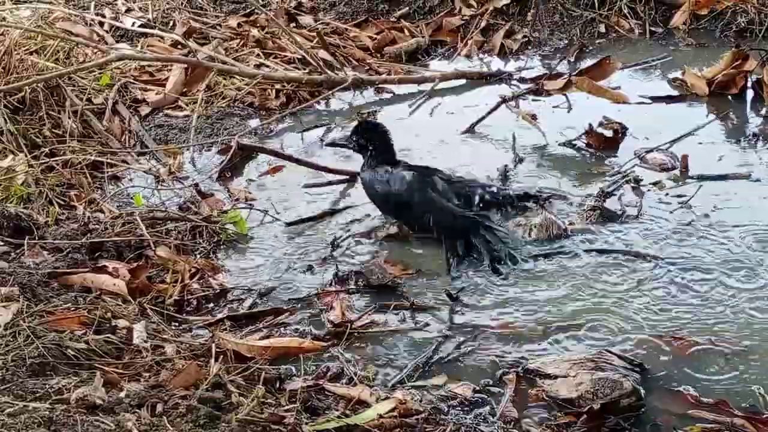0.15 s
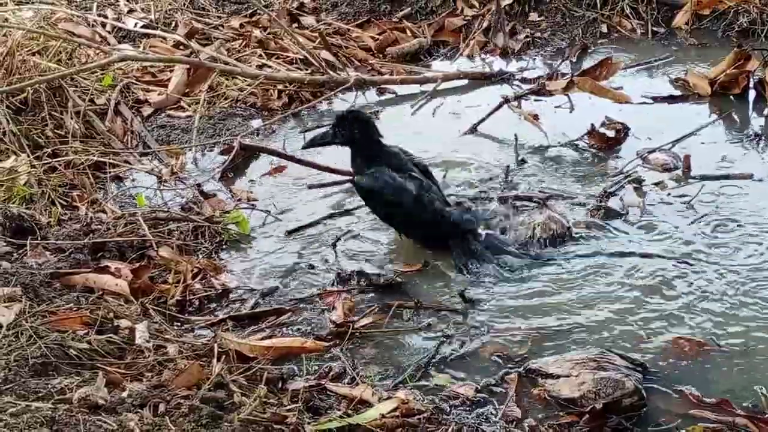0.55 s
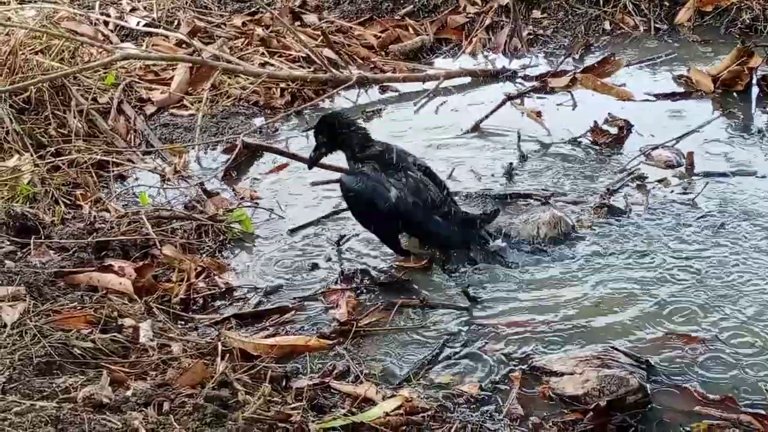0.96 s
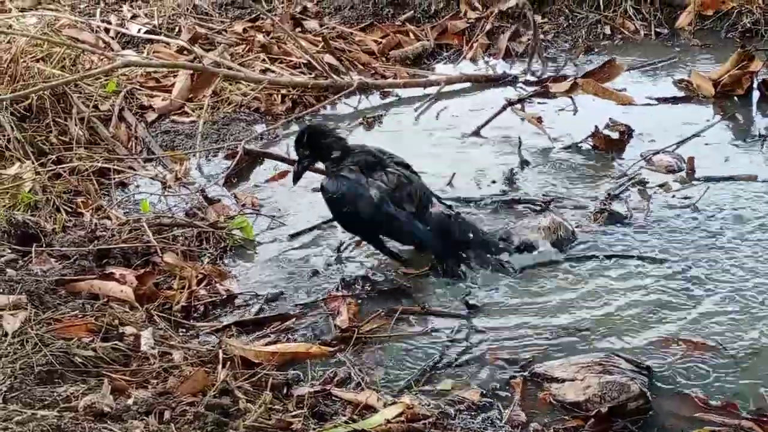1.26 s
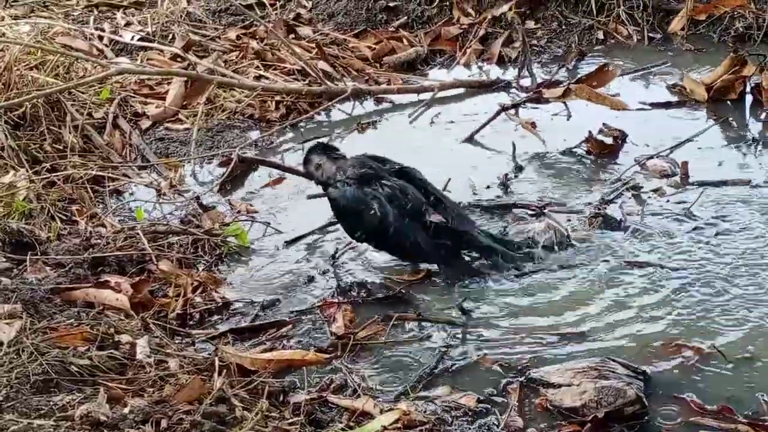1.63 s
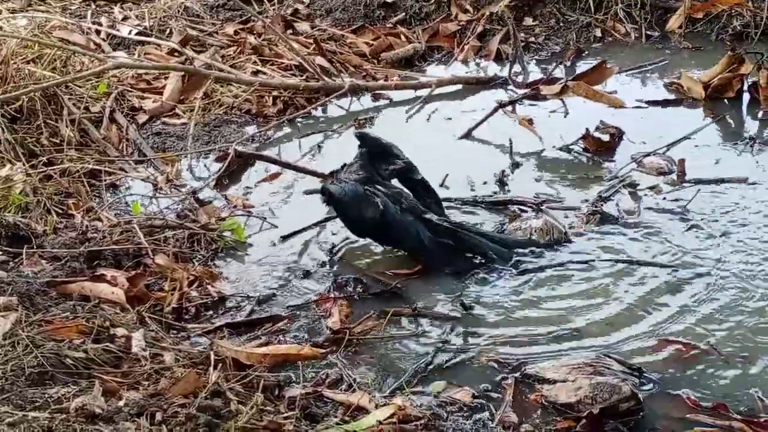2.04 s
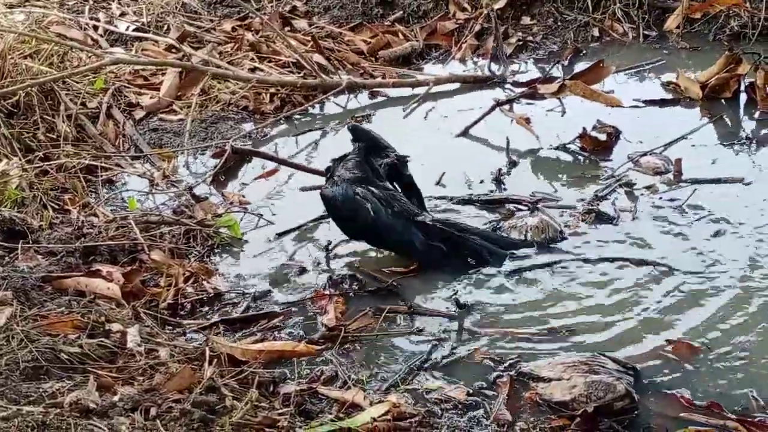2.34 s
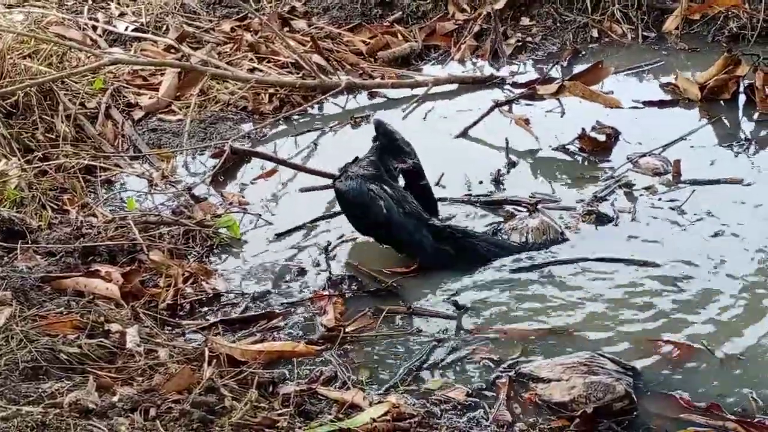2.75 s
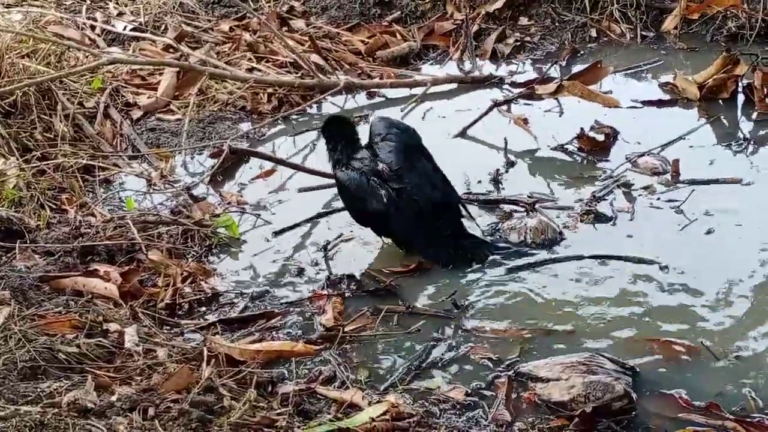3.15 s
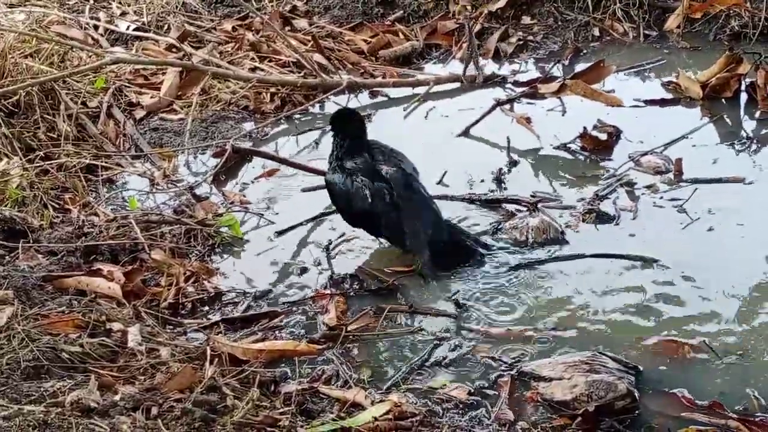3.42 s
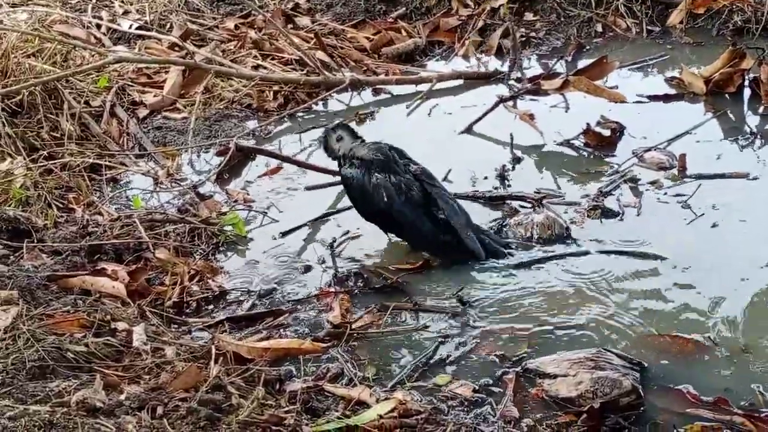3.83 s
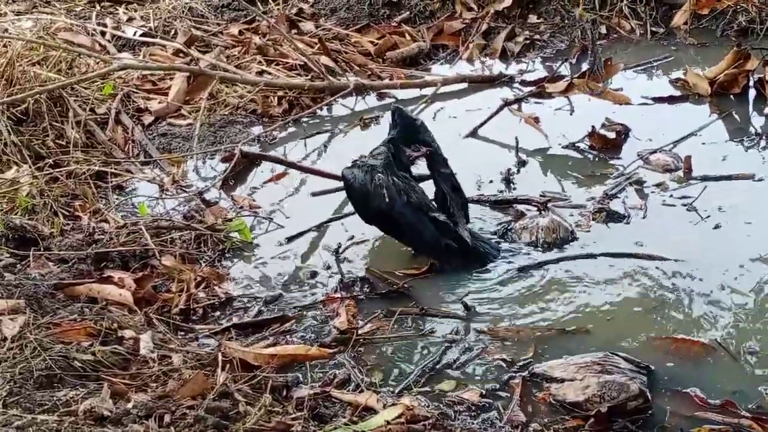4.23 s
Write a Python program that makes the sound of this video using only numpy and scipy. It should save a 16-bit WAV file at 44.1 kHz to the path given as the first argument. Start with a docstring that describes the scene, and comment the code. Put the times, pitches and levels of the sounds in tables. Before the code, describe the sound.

Rapid bright wing splashes with plinking drops give way to near quiet, one soft hollow knock, sparse wet ticks and a distant engine drone.

```python
"""Crow bathing in a shallow puddle

Straight ahead, wet wings slap the water about seven times a second: crackle, mist, drops and ringing bubbles.
Then it preens, with a few small ticks; one dull, hollow thud of bumps and decaying modes sounds midway.
Off to the right lie a faint far engine, drone tones over a deep rumble, and an outdoor hiss of patchy noise."""
import sys
import numpy as np
from scipy import signal
from scipy.fft import rfft, irfft, next_fast_len
from scipy.io import wavfile
from scipy.ndimage import uniform_filter1d, map_coordinates

SR = 44100
rng = np.random.default_rng(int(sys.argv[2]) if len(sys.argv) > 2 else 0)


def store_wav(level_fs):
    """Save 16-bit WAV to argv[1]."""
    pcm = np.round(np.clip(np.atleast_2d(level_fs), -1, 1) * 32767)
    wavfile.write(sys.argv[1], SR, pcm.T.astype(np.int16))


N = 193202

# Wing strokes in the water, hard or gentle. Each row: moment in seconds, relative level in dB, rise in s,
# fall in s, then relative to the stroke: low slap in dB, air pocket pitch in Hz, its ring in dB, mist in dB.
WING_STROKES = [(.007, -32.5, .0088, 0.018, -19, 930, -15.5, -8),
                (.165, -34, 0.00089, 0.0054, -12, 2300, 0, -16),
                (.378, -50.5, .008, 0.077, 8, 1270, 4, -20), (.457, -33, 0.004, 0.0078, -8, 940, -13, -11),
                (.58, -33.5, 0.0069, 0.01, -13, 3400, -5.5, -6),
                (.699, -33.5, .0027, 0.0053, -6, 1700, -10, -9),
                (.713, -35, .0024, .0071, -3, 1720, -9, -11), (.841, -36, .008, 0.014, -5, 5660, -3, -4),
                (.857, -33.5, .0077, 0.014, -13, 2450, -2.5, -12),
                (.991, -27, 0.0036, 0.0078, 1, 1190, -4.5, -8),
                (1.132, -29.5, 0.0074, 0.012, -0.5, 4450, -2, -7),
                (1.28, -32.5, .0044, .018, 0.5, 2500, -5, -6),
                (1.46, -30.5, .0069, 0.012, -0.5, 7440, -2.5, -18),
                (1.573, -40, .0008, 0.014, -12, 2100, 3, -20),
                (1.684, -37, .001, 0.013, -9, 4700, -12, -20),
                (1.816, -43.5, .0008, .014, -3, 2550, -1, -20),
                (2.745, -45, .0089, .012, 3.5, 1600, -11, -30),
                (4.15, -61, 0.029, 0.06, 12.5, 2200, -5, -30)]
# Colour of splashing water. Each row: frequency in Hz, relative density in dB per Hz.
WATER_COLOUR = [(300, -53), (700, -16), (1200, -5), (1800, -5), (3000, -4.5), (4400, 1.5), (5100, -5),
                (5800, 0), (7400, 0), (8300, -8.5), (9300, -19), (11200, -28.5), (15500, -12)]
# Colour of a single drop's crack. Each row: frequency in Hz, relative density in dB per Hz.
DROPLET_COLOUR = [(500, -45), (1200, -15.5), (1800, -9.5), (3000, -4), (4400, 3), (5100, -2.5), (5800, -1),
                  (7400, 1), (8300, -7), (9300, -20.5), (11200, -25.5), (15500, -10.5)]


def wings():
    """Each stroke tears the surface into crackle and fizz over a slap, rings an air pocket, throws mist and beads."""
    # Colours of the low slap and the finest spray. Each row: frequency in Hz, relative density in dB per Hz.
    slap_colour = [(40, -30), (150, -2), (330, -1.5), (520, -15), (660, -20.5), (950, -1.5), (1350, 0),
                   (2200, -7), (4000, -32), (8000, -51)]
    mist_colour = [(7000, -45), (8500, -10), (9500, -4), (11200, -9), (12500, -3), (15500, 1)]
    pocket_q = 4.4  # sharpness of the air pocket under a wing
    mist_lingers = 1.2  # the mist's decay time over the stroke's
    beads_db, beads_rise_s, beads_fall_s = -16, .005, 0.031  # larger beads that click apart
    flutter_db, flutter_rate = 1.5, 330  # feathers break the surface unevenly: depth, changes per second

    crackle = coloured(patter(rate=3100, spread_db=4.5), WATER_COLOUR)
    froth = coloured(fizz(rate=1500, cycles=4.9, spread_db=1.5), WATER_COLOUR)
    gurgle = unit(blips(rate=260, low_hz=450, spread=4.9, cycles=4.0, spread_db=15))
    slap = coloured(patter(rate=2900, spread_db=5.5) + .3 * gurgle, slap_colour)
    beads = coloured(patter(rate=330, spread_db=2.5), DROPLET_COLOUR)
    knocks = patter(rate=2500, spread_db=8.0)
    mist = coloured(patter(rate=1800, spread_db=4), mist_colour)
    out = np.zeros(N)
    for s, db, rise, fall, slap_db, hz, pocket_db, mist_db in WING_STROKES:
        b, a = signal.iirpeak(hz, pocket_q, SR)
        # two passes make the pocket's skirts steeper
        pocket = unit(signal.lfilter(b, a, signal.lfilter(b, a, knocks)))
        splash = 0.86 * crackle + 0.62 * froth
        body = splash + amp(slap_db - 7.0) * slap + amp(pocket_db) * pocket
        out += amp(db - 3.5) * swell(s, rise, fall) * body
        out += amp(db + mist_db - 4.5) * swell(s, rise, mist_lingers * fall) * mist
        out += amp(db + beads_db) * swell(s, beads_rise_s, beads_fall_s) * beads
    return out * unit(amp(flutter_db * wobble(flutter_rate)))


def churn():
    """Small bubbles keep popping up in the stirred water, calming after each stroke."""
    # Colour of the churned water. Each row: frequency in Hz, relative density in dB per Hz.
    churn_colour = [(500, -38), (780, -16), (950, -5.5), (1250, 5), (1700, -6.5), (2300, 1), (3300, -5),
                    (5000, -25)]
    level_db, rise_s, fall_s = -19.5, 0.024, 0.081  # relative to the stroke, build-up, time to calm
    pops = blips(rate=170, low_hz=853, spread=4.5, cycles=11.8, spread_db=16.0)
    stirred = stroke_power(level_db, rise_s, fall_s)
    return np.sqrt(stirred) * coloured(pops, churn_colour)


def spray():
    """Fine droplets fly with every stroke and fall in showers: tiny impacts mixed with short rings."""
    # Showers shaken from the plumage. Each row: middle in seconds, level in dB, half length in s.
    showers = [(0.207, -39, 0.06), (0.397, -48.5, 0.03), (0.65, -49.5, 0.056), (0.813, -40.5, 0.031),
               (1.069, -41, 0.031), (1.156, -46, .01), (1.233, -45.5, 0.025), (1.658, -44.5, 0.034),
               (3.37, -50, .02), (3.537, -47.5, 0.052)]
    level_db, rise_s, fall_s = -12, 0.032, 0.037  # relative to the stroke, build-up, time to settle
    trickle_db = -60  # water running off the feathers all the time
    thrown = stroke_power(level_db, rise_s, fall_s)
    shaken = sum((amp(db) * np.exp(-((clock() - s) / half) ** 2)) ** 2 for s, db, half in showers)
    droplets = patter(rate=5000, spread_db=3.2) + .7 * fizz(rate=2000, cycles=7, spread_db=2.8)
    level = np.sqrt(thrown + shaken + amp(trickle_db) ** 2)
    return level * amp(0.94 * wobble(70)) * coloured(droplets, WATER_COLOUR)


def drops():
    """A drop lands with a crack and a tick of a few cycles, then a thin splatter; droplets fall back after it."""
    # Drops and feather flicks. Each row: moment in seconds, level in dB, centre of the tick in Hz,
    # splatter in dB and crack in dB relative to the drop.
    drop_rows = [(.0075, -17, 6540, -11.5, -10), (0.1295, -40, 7740, -17, -11),
                 (.1445, -35, 6500, -12, -11), (.1485, -29.5, 6700, -9, -11),
                 (0.1638, -18.5, 4650, -9, -10), (0.1695, -30, 6160, -19, -11),
                 (.2035, -26, 7200, -12, -11), (0.406, -30, 5630, -12, -11),
                 (0.4234, -27.5, 6170, -10, -13), (.431, -29, 4100, -18, -11),
                 (.4545, -23.5, 7700, -9, -13), (.4568, -26, 4440, -16, -13),
                 (0.459, -22.5, 6200, -16, -11), (.4822, -28, 3300, -8, -11), (0.572, -28, 3980, -20, -14),
                 (0.5772, -20, 3840, -29, -8), (0.5823, -27, 4130, -16, -11), (0.6137, -29, 2740, -11, -9),
                 (.625, -27, 7600, -23, -9), (.6478, -28, 7700, -10, -11), (0.6883, -22.5, 5900, -13, -12),
                 (0.6984, -31, 4300, -16, -13), (0.7114, -28, 6000, -14, -11),
                 (0.7588, -26.5, 4400, -13, -11), (.8013, -27, 2360, -6.5, -5), (.8262, -31, 6000, -12, -8),
                 (.837, -27, 6000, -12, -7), (.8419, -26, 5330, -16, -11), (.8547, -24.5, 4700, -21, -8),
                 (0.8586, -27, 3400, -20, -13), (0.934, -29, 3760, -13, -11), (.945, -32, 5960, -1, -6),
                 (.9557, -20.5, 6460, -8, -12), (.9713, -25, 6700, -9, -2), (.9812, -22, 6000, -6, -11),
                 (0.9903, -14.5, 5800, -10, -11), (1.0932, -24.5, 7350, -16, -16),
                 (1.098, -26, 6900, -14, -15), (1.122, -31, 6040, -2, -8), (1.1283, -18.5, 4100, -26, -19),
                 (1.132, -19, 4300, -16, -9), (1.1346, -21, 7200, -14, -11), (1.159, -27, 3800, -14, -9),
                 (1.2405, -29, 6000, -14, -9), (1.2492, -20.5, 7250, -16, -13),
                 (1.266, -30, 4200, -17, -11), (1.272, -25, 6000, -12, -15), (1.2803, -17, 7300, -15, -11),
                 (1.283, -29, 4400, -19, -11), (1.4181, -23.5, 7160, -6.5, -10),
                 (1.439, -35, 5500, -14, -8), (1.448, -28, 6400, -8, -13), (1.4581, -18.5, 6700, -10, -15),
                 (1.4714, -37, 6900, -16, -13), (1.5708, -26, 4080, -13, -13),
                 (1.680, -16.5, 4300, -14, -13), (1.682, -20, 5360, -24, -15), (1.72, -33, 3870, -12, -9),
                 (1.814, -28.5, 6800, -7, -14), (1.858, -33, 3000, -17, -15),
                 (1.9455, -32.5, 4970, -23, -17), (1.969, -32.5, 3920, -5, -11),
                 (3.012, -25, 3880, -15, -22), (3.019, -34, 6000, -11, -14), (3.312, -35.5, 2700, -5, -6),
                 (3.342, -24.5, 6150, -11, -8), (3.3431, -22, 4050, -20, -14),
                 (3.3493, -28, 6700, -18, -15), (4.2945, -28, 3900, -15, -14), (4.304, -40, 2700, -7, -14)]
    crack_fall_s = 0.00056  # decay of the bright crack of first contact
    after_db, after_fall_s = -24, 0.014  # droplets that fall back: level relative to the drop, decay

    out = np.zeros(N)
    splatter = coloured(patter(rate=9000, spread_db=2.0), DROPLET_COLOUR)
    crack = coloured(rng.standard_normal(N), DROPLET_COLOUR)
    droplets = coloured(fizz(rate=1300, cycles=4.9, spread_db=3.5), DROPLET_COLOUR)
    for s, db, hz, splatter_db, crack_db in drop_rows:
        tick = np.sin(2 * np.pi * hz * (clock() - s)) * swell(s + .0004, .00015, .0006)
        contact = 0.83 * tick + amp(crack_db) * crack * swell(s + 0.00036, 0.0001, crack_fall_s)
        scattered = amp(splatter_db) * splatter * swell(s + 0.00107, 0.00012, 0.0034)
        falling_back = amp(after_db) * droplets * swell(s + 0.0051, 0.00045, after_fall_s)
        out += amp(db) * (contact + scattered + falling_back)
    return out


def bubbles(cycles, glide):
    """Trapped air rings briefly, rising in pitch as it nears the surface."""
    # Ringing air bubbles. Each row: start in seconds, pitch at the start in Hz, level in dB.
    bubble_rows = [(0.068, 1180, -36.5), (0.142, 1190, -34), (0.163, 1164, -28), (.165, 970, -34),
                   (0.177, 1350, -32), (.233, 4300, -30), (.244, 3950, -30), (.371, 1165, -34),
                   (0.575, 1016, -35.5), (.6145, 2950, -29), (.759, 3900, -29), (.800, 2930, -27),
                   (.801, 2180, -22), (.840, 1070, -35), (0.859, 2700, -28), (0.985, 1112, -25.5),
                   (0.986, 1340, -33), (0.991, 1530, -22), (1.064, 2350, -33), (1.13, 2060, -26),
                   (1.131, 530, -39), (1.135, 1580, -31), (1.271, 1210, -34), (1.28, 1470, -30),
                   (1.280, 935, -33), (1.46, 1510, -30), (1.570, 2280, -31), (1.688, 1950, -28),
                   (3.012, 2920, -30), (3.342, 3900, -32), (4.295, 3860, -32)]
    out = np.zeros(N)
    for s, hz, db in bubble_rows:
        turns = np.clip(clock() - s, 0, .1) * hz
        ring = np.sin(2 * np.pi * turns * (1 + glide * turns / cycles))
        out += amp(db) * ring * np.exp(-turns / cycles) * (1 - np.exp(-turns))
    return out


def thud():
    """A soft, uneven blow lands in quick bumps, a scuff and a low push each; something hollow rings, wet scatter."""
    # Modes of the hollow ring. Each row: pitch in Hz, relative level in dB, time to fall 60 dB in s, start in s.
    hollow_modes = [(157, -10.5, 0.16, 2.047), (211.5, -8.5, .16, 2.047), (289.5, -15, 0.23, 2.052),
                    (340.4, 1, .16, 2.031), (538.5, -4.5, 0.11, 2.049), (673, -15, 0.18, 2.045),
                    (820, -12, 0.15, 2.038), (875, -10, 0.14, 2.038), (994, -11, 0.088, 2.044),
                    (1102, -10, 0.34, 2.04), (1160, -12, 0.083, 2.044), (1195, -2, 0.097, 2.044),
                    (1614, -21, .26, 2.044), (2270, -6, .16, 2.045), (2410, -13.5, 0.26, 2.045),
                    (3900, -10, 0.25, 2.04), (4480, -13, .14, 2.04)]
    # Bumps of the blow. Each row: moment in seconds, level in dB, rise in s, fall in s,
    # low push in dB relative to the bump.
    bump_rows = [(2.035, -39, .0015, 0.0037, -10), (2.0407, -30, 0.0035, 0.0052, -15),
                 (2.0483, -23.5, .0014, 0.0025, -13.5), (2.058, -28, 0.0027, 0.013, -4.5),
                 (2.073, -43, .002, .008, -6), (2.088, -41.5, .003, 0.0054, -10),
                 (2.097, -45, .002, 0.0092, 4), (2.135, -52, .006, .035, -2)]
    # Colours of scuff, low push and wet scatter. Each row: frequency in Hz, relative density in dB per Hz.
    scuff_colour = [(200, -25), (420, -9), (540, -8), (620, -9), (820, -1), (1100, 4), (1550, -5.5),
                    (2200, 1), (3000, -6), (4400, -6), (7400, -12), (9300, -34), (15500, -48)]
    push_colour = [(40, -22), (80, -6), (140, 1.5), (330, -4), (420, -6), (540, -2), (700, -14),
                   (1500, -41)]
    scatter_colour = [(300, -14), (700, -7), (1200, 3), (2400, -2), (4000, 0), (7400, 0), (8500, -7),
                      (9500, -27), (15500, -27)]

    ring = np.zeros(N)
    for hz, db, t60, s in hollow_modes:
        t = np.maximum(clock() - s, 0)
        envelope = amp(db - 60 * t / t60) * (1 - np.exp(-t / .005))
        ring += envelope * np.sin(2 * np.pi * (hz * t + rng.random()) + .6 * wobble(110))
    lumps = amp(1.5 * wobble(200))  # unevenness of the scuff
    scuff = lumps * coloured(patter(rate=5000, spread_db=1.5), scuff_colour)
    push = coloured(rng.standard_normal(N), push_colour)
    bumps = sum(amp(db) * swell(s, rise, fall) * (scuff + amp(push_db) * push)
                for s, db, rise, fall, push_db in bump_rows)
    wet = coloured(patter(rate=700, spread_db=3), scatter_colour)
    scatter = amp(-38.5) * swell(2.058, rise=.008, fall=.052) * wet
    return bumps + scatter + amp(-25) * ring


def bank(x):
    """A short, scattered echo off the ground and leaves: decaying noise as the impulse response."""
    # Colour of the bank's echo. Each row: frequency in Hz, gain in dB on top of the echo's level.
    bank_colour = [(200, 12), (600, 10), (2000, 3), (4500, -23), (8000, 7), (13000, 13)]
    echo_db, fall_s = -33, 0.0033
    t = np.arange(SR // 30) / SR
    tail = rng.standard_normal(len(t)) * np.exp(-t / fall_s)
    echo = signal.fftconvolve(x, tail / np.linalg.norm(tail))[:N]
    return filtered(echo, lambda hz: amp(echo_db + along(bank_colour, hz)))


def background():
    """Far engine and whistles in outdoor hiss, whose mottled middle swells and thins while narrow bands flicker."""
    # Colours of the broad, middle and upper-middle hiss. Each row: frequency in Hz, relative density in dB per Hz.
    hiss_colour = [(300, -14), (550, -22.5), (750, -28), (1250, -13), (2300, -11), (3100, -18),
                   (3900, -4.5), (4900, 0), (6600, 4.5), (7600, 3.5), (8300, -4), (9300, -25), (11300, -46),
                   (12300, -23.5), (15500, -25)]
    middle_colour = [(500, -30), (720, -11), (1000, -3), (1250, 2), (1550, -0.5), (2300, 4.5), (3200, -2.5),
                     (5000, -9), (8000, -45)]
    upper_colour = [(2000, -27), (2750, -6), (3300, 4.5), (4200, -1.5), (5200, -7.5), (7000, -41.5)]
    # Levels of the middle and upper-middle hiss. Each row: time in seconds, level in dB.
    middle_level = [(0, -58.5), (1.35, -56.5), (1.55, -53.5), (1.9, -58), (2.3, -53.5), (2.7, -57),
                    (3.15, -58), (3.5, -55.5), (3.9, -58.5), (4.1, -52.5), (4.37, -54)]
    upper_level = [(0, -54), (.9, -55), (1.38, -64), (1.9, -54), (2.3, -58), (2.7, -54.5), (3.2, -55.5),
                   (3.5, -60), (3.75, -61), (4.1, -65), (4.37, -56)]
    # Narrow bands in the hiss. Each row: centre in Hz, width in Hz, relative gain in dB.
    band_rows = [(676, 42, -13), (902, 28, -3.5), (1201, 103, 3), (1367, 90, 1), (1677, 70, -4),
                 (2185, 100, 1.5), (2654, 186, -0.5), (3930, 350, 0.5)]

    middle = amp(curve(middle_level)) * rush(middle_colour, patchy_db=3.2)
    upper = amp(curve(upper_level)) * rush(upper_colour, patchy_db=2.2)
    flat = rush([(100, 0), (9000, 0)], patchy_db=2.5)
    bands = unit(filtered(flat, lambda hz: resonances(band_rows, hz)))
    air = amp(-51) * rush(hiss_colour, patchy_db=2.5) + middle + upper + amp(-55) * bands
    return engine() + whistles() + air


def engine():
    """A far engine drones with wavering tones and coloured noise over an uneven deep rumble."""
    # Tones in the drone. Each row: pitch in Hz, relative level in dB.
    drone_tones = [(79.6, -28), (93, -16.5), (99.6, -29), (119.6, -11), (139.5, -8.5), (159, -12.5),
                   (179, -15), (185, -11), (219, -12.5), (233, -13), (277.5, -11)]
    # Colours of the drone's noise and the deep rumble. Each row: frequency in Hz, relative density in dB per Hz.
    rumble_colour = [(50, -28), (100, -22), (150, -1.5), (280, -3.5), (320, -10.5), (375, -17.5),
                     (460, -34.5), (600, -40), (1500, -55)]
    deep_colour = [(20, -29), (42, -19), (65, -7), (95, 6), (130, 3), (200, -35), (500, -58)]
    # Level curves of drone and deep rumble, before trims. Each row: time in seconds, relative level in dB.
    drone_level = [(0.0, -45), (0.39, -50), (0.57, -43.5), (1.14, -47), (1.29, -46), (1.53, -51.5),
                   (2.07, -44), (2.1, -53.5), (2.49, -49.0), (3.69, -49.5), (3.81, -47), (4.05, -53.5),
                   (4.17, -45), (4.37, -48)]
    deep_level = [(0.0, -48), (0.57, -51), (0.84, -55.5), (1.56, -52), (1.71, -54), (1.86, -48.5),
                  (2.1, -66), (2.34, -48), (2.7, -66), (2.97, -47.5), (3.18, -69), (3.33, -50), (3.45, -66),
                  (3.99, -50), (4.11, -65), (4.37, -60)]

    tones = np.zeros(N)
    for hz, db in drone_tones:
        level = amp(db + 2.85 * wobble(4.22)) * np.sqrt(2)
        tones += level * np.sin(2 * np.pi * hz * clock() + 0.68 * wobble(3.07))
    noise = rush(rumble_colour, patchy_db=1.5)
    drone = amp(curve(drone_level) + 1.66 * wobble(25.08)) * (amp(-4.5) * tones + amp(-6.5) * noise)
    deep = coloured(rng.standard_normal(N), deep_colour)
    return drone + amp(curve(deep_level) - 2.0 + 2.8 * wobble(10)) * deep


def whistles():
    """Thin, slightly wavering tones fade in and out far away."""
    # Each row: middle in seconds, half length in s, pitch at the middle in Hz, glide in Hz per s, level in dB.
    whistle_rows = [(2.03, 0.15, 1140, 2, -58), (2.279, 0.14, 2345, -550, -58.5),
                    (2.971, 0.07, 900, 0, -64), (3.159, 0.16, 2124, -180, -55.5)]
    out = np.zeros(N)
    for s, half, hz, glide, db in whistle_rows:
        t = clock() - s
        phase = 2 * np.pi * (hz + glide * t / 2) * t
        fade = np.exp(-(t / half) ** 4)
        out += amp(db + 3 * wobble(22)) * fade * np.sin(phase + .35 * wobble(18))
    return out


def stroke_power(level_db, rise_s, fall_s):
    """Summed power of one swell around every wing stroke, at a level relative to it."""
    return sum((amp(db + level_db) * swell(s, rise_s, fall_s)) ** 2 for s, db, *_ in WING_STROKES)


def patter(rate, spread_db):
    """Tiny impacts at random moments (rate per second) and of random sizes, at rms 1."""
    hits = rng.random(N) < rate / SR
    sizes = amp(spread_db * np.clip(rng.standard_normal(N), -2, 2))
    return unit(hits * rng.choice([-1, 1], N) * sizes)


def fizz(rate, cycles, spread_db):
    """Tiny droplets (rate per second), each ringing for a few cycles at its own pitch, at rms 1."""
    when, pitch, size = rng.random((int(rate * N / SR), 3)).T[:, :, None]
    age = np.arange(SR // 200)
    turns = (1000 + 11000 * pitch) * age / SR
    strength = amp(spread_db * np.minimum(-np.log(1 - size), 3)) * np.sqrt(pitch)
    grains = strength * np.sin(2 * np.pi * turns) * np.exp(-turns / cycles)
    return unit(scattered_grains(when, age, grains))


def blips(rate, low_hz, spread, cycles, spread_db):
    """A cloud of small bubbles, each a short blip rising in pitch; spread is highest over lowest pitch."""
    when, pitch, size = rng.random((int(rate * N / SR), 3)).T[:, :, None]
    age = np.arange(SR // 25)
    turns = low_hz * spread ** pitch * age / SR
    envelope = np.exp(-turns / cycles) * (1 - np.exp(-turns))
    rings = amp(spread_db * size) * np.sin(2 * np.pi * turns * (1 + 0.017 * turns / cycles)) * envelope
    return scattered_grains(when, age, rings)


def scattered_grains(when, age, grains):
    """Add up all grains, each at its own moment (0 to 1 of the whole length)."""
    return np.bincount(((when * N).astype(int) + age).ravel(), grains.ravel(), N)[:N]


def rush(spectrum, patchy_db):
    """Noise of rms 1 with drifting patches of gain in time and frequency."""
    z = signal.stft(rng.standard_normal(N), nperseg=1024)[2]
    field = uniform_filter1d(rng.standard_normal(z.shape), size=4, axis=0)
    field = uniform_filter1d(field, size=10, axis=1)
    patchy = signal.istft(z * amp(patchy_db * unit(field)), nperseg=1024)[1][:N]
    return coloured(patchy, spectrum)


def resonances(modes, f):
    """Gain of (Hz, width, dB) resonances with steep skirts."""
    return sum(amp(db) / (1 + (2 * (f - c) / w) ** 2) for c, w, db in modes)


def swell(s, rise, fall):
    """An envelope that grows up to time s and dies away after it."""
    t = clock() - s
    return np.exp(-np.abs(t) / np.where(t < 0, rise, fall))


def wobble(rate):
    """A smooth random curve, rate knots a second."""
    return map_coordinates(rng.standard_normal(int(N * rate / SR) + 4), [clock() * rate])


def curve(rows):
    """One value per sample from (s, value) rows."""
    s, values = np.transpose(rows)
    return np.interp(clock(), s, values)


def clock():
    """The time of every sample in seconds."""
    return np.arange(N) / SR


def coloured(x, spectrum):
    """x filtered by the given spectrum, at rms 1."""
    return unit(filtered(x, lambda hz: amp(along(spectrum, hz))))


def filtered(x, response):
    """x times a response of frequency, padded by half a second."""
    m = next_fast_len(N + SR // 2)
    return irfft(rfft(x, m) * response(np.fft.rfftfreq(m, 1 / SR)), m)[..., :N]


def along(points, hz):
    """Interpolate (Hz, value) points on a log axis."""
    f, v = np.transpose(points)
    return np.interp(np.log(hz + 1), np.log(f + 1), v)


def unit(x):
    """Scale to rms 1."""
    return x / np.sqrt(np.mean(x ** 2) + 1e-20)


def amp(db):
    """Decibels to gain."""
    return 10 ** (np.asarray(db) / 20)


def scene():
    """The bird is straight ahead, widened by the bank; far sounds lean right and are partly diffuse."""
    # Lean of the far sounds. Each row: frequency in Hz, left minus right in dB.
    far_pan = [(30, 3), (60, -2), (110, -8), (200, -15), (380, -7), (700, -2.5), (1290, -13.5), (2380, -3),
               (4400, -2.5), (8000, -0.5)]
    # Diffuse share of the far sounds. Each row: frequency in Hz, gain in dB.
    far_width = [(30, -20), (300, -23), (1300, -20), (3000, -14), (5000, -27.5), (7500, -49), (13000, -2)]

    def lean(hz):
        """Left and right gains with a mean of 1."""
        half_db = along(far_pan, hz) / 2
        gains = amp(np.array([half_db, -half_db]))
        return gains / gains.mean(axis=0)

    near = wings() + spray() + churn() + drops() + bubbles(cycles=4.2, glide=0.0074) + thud()
    far = filtered(background(), lean)
    # a second, independent background is the diffuse part, opposite in the two channels
    diffuse = filtered(background(), lambda hz: amp(along(far_width, hz)))
    side = diffuse + bank(near)
    return near + far + np.array([side, -side])


def record(dry):
    """Nothing is kept from 15650 Hz up."""
    return filtered(dry, lambda hz: hz < 15650)


dry = scene()
out = record(dry)
store_wav(out)
```